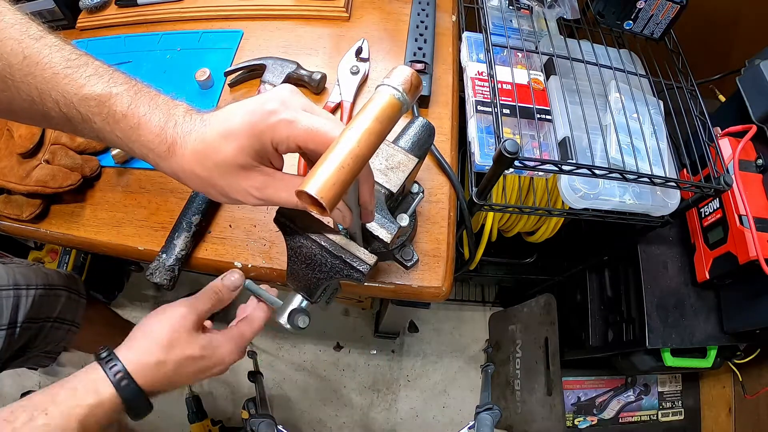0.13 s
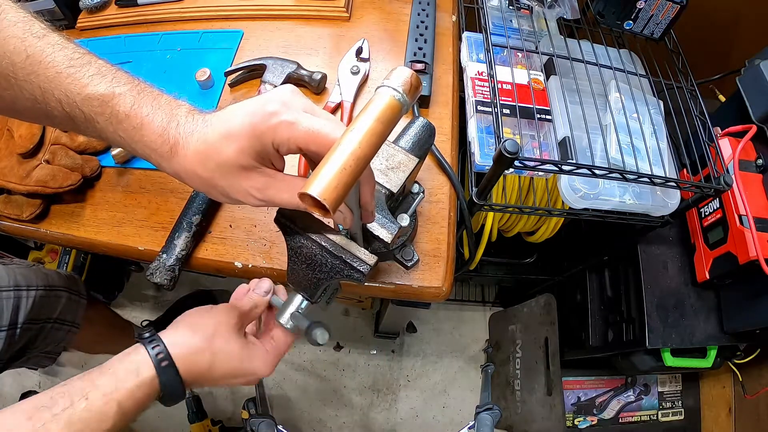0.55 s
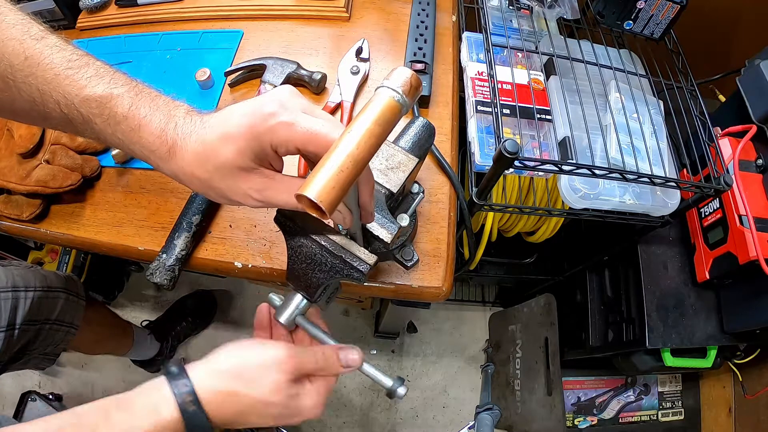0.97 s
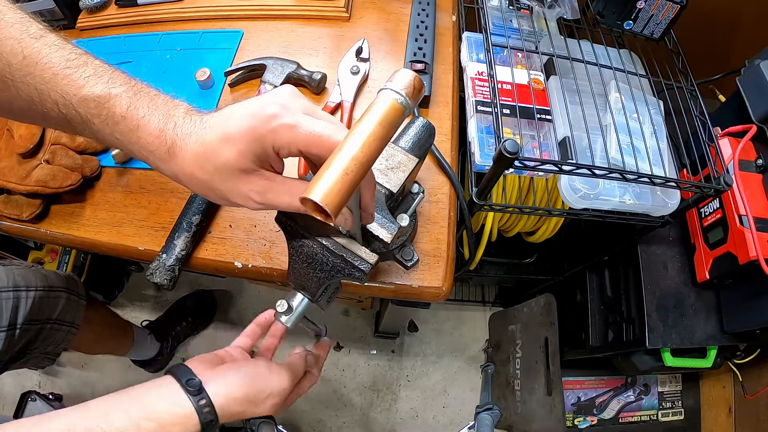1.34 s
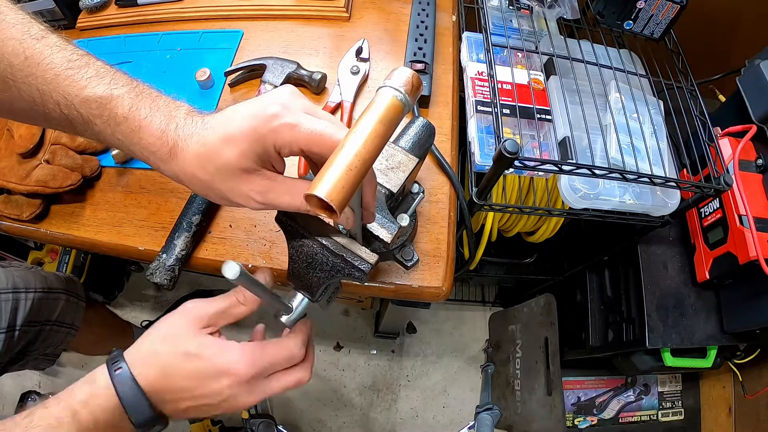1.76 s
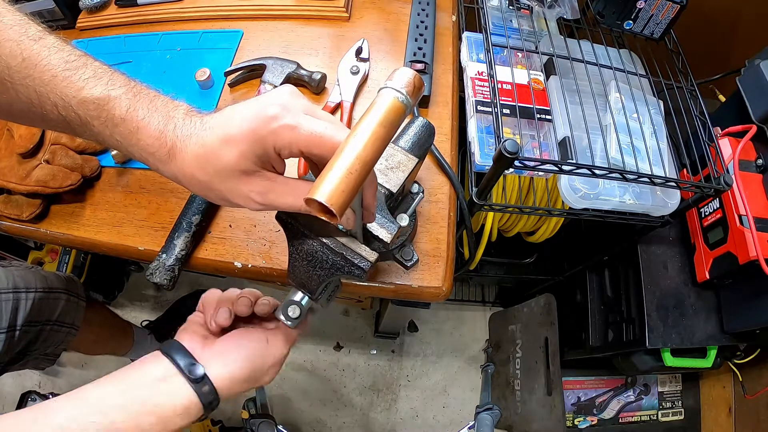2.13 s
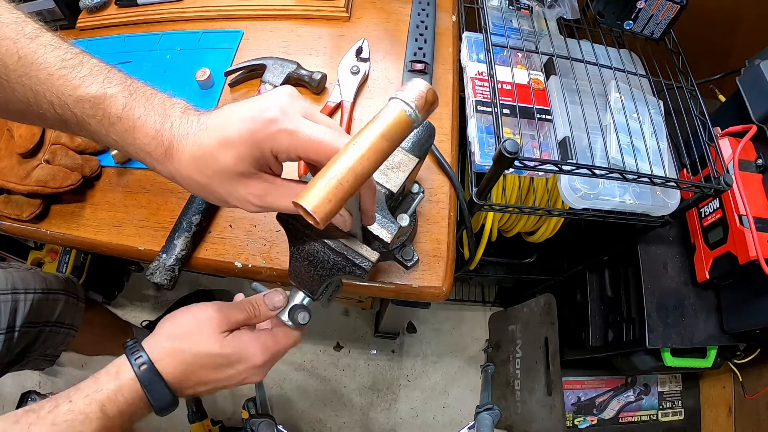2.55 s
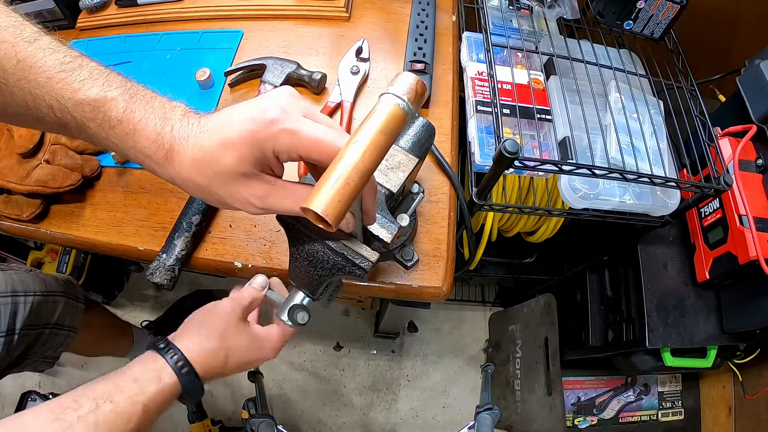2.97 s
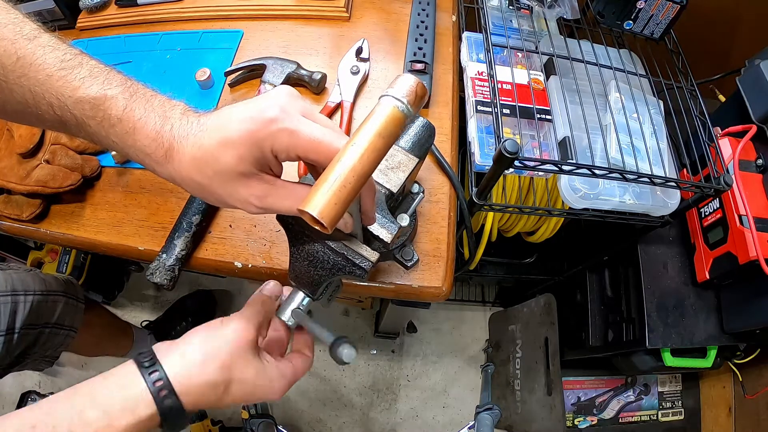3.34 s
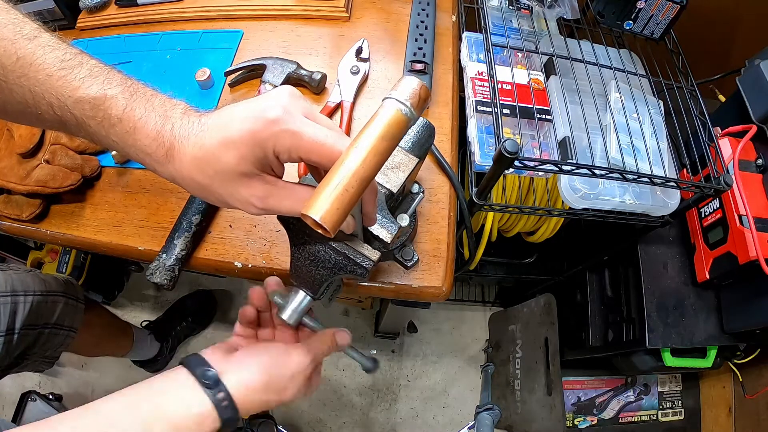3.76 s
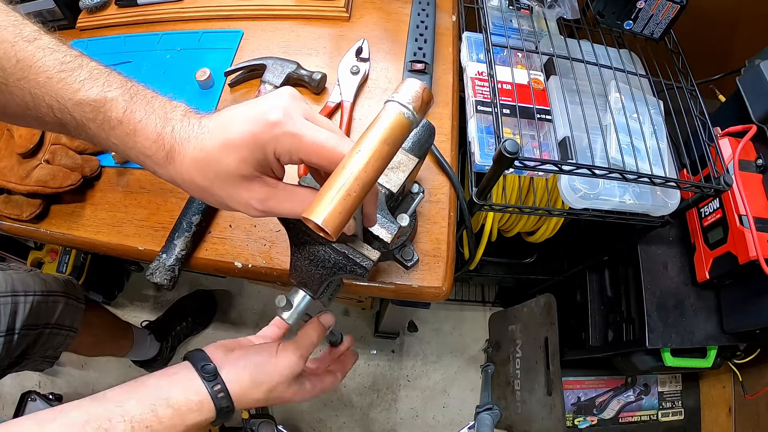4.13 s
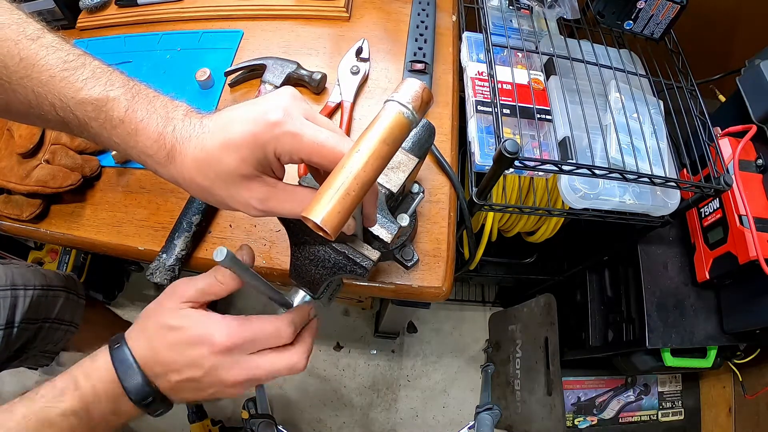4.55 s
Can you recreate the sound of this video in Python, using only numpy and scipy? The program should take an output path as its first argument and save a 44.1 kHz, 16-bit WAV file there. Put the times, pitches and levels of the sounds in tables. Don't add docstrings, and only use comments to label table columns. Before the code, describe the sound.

A hand turns a bench vise whose loose steel bar keeps slipping through the screw hub. Each slide is a brief gritty scrape ending in a hard, bright clank, followed by bounces and a short drag. Duller iron taps and soft wooden thumps fill the spaces between. Recorded close in stereo, with a short garage reverberation and very quiet outdoor air; the final slide is the strongest, with two hard knocks.

```python
import sys
import numpy as np
from scipy import signal
from scipy.fft import rfft, irfft, next_fast_len
from scipy.io import wavfile
from scipy.ndimage import uniform_filter1d

SR = 44100
rng = np.random.default_rng(int(sys.argv[2]) if len(sys.argv) > 2 else 0)


def wav_record(signal):
    frames = np.transpose(np.atleast_2d(signal))
    bounded = np.clip(frames, -1, 1)
    quanta = np.round(bounded * 32767).astype(np.int16)
    wavfile.write(sys.argv[1], SR, quanta)


def volts_from_db(level):
    exponent = np.asarray(level, float) / 20
    return 10 ** exponent


N = 207262


def evened(x):
    return x / np.sqrt(np.mean(abs(x) ** 2) + 1e-20)


def read(points, hz):
    f, value = np.transpose(points)
    return np.interp(np.log(hz + 1), np.log(f + 1), value)


def add(mix, at, sound):
    part = mix[at:][:len(sound)]
    part += sound[:len(part)]


def resonate(x, hz, width_hz):
    r = np.exp(-np.pi * width_hz / SR)
    return signal.lfilter([1 - r], [1, -r * np.exp(2j * np.pi * hz / SR)], x)


def band(x, lo_hz, hi_hz, order=4):
    return signal.sosfilt(signal.butter(order, [lo_hz, hi_hz], "bandpass", fs=SR, output="sos"), x)


# [f/Hz, level/dB per Hz]
HUSH_TONE = [(15, -45), (25, -8), (48, -10.5), (100, -22.5), (198, -4), (422, -13.5), (563, -11.5),
             (1000, -6.5), (1300, -7.5), (1410, -7.5), (1730, -10), (2780, -22), (4220, -31), (7500, -24),
             (13000, -60.5)]
# [f/Hz, left-right likeness]
HUSH_LIKENESS = [(60, 0.88), (240, 0.33), (950, 0.13), (3770, 0.6), (15000, -0.56)]
# [f/Hz, width/Hz, level/dB]
WHINE = (7460, 160, -79)


def air():
    frames, hz = N // 256 + 5, np.fft.rfftfreq(1024, 1 / SR)
    a, b, c, d, patches = rng.standard_normal((frames, 513, 5)).T
    patches = evened(uniform_filter1d(uniform_filter1d(patches, 12, 0), 14, 1))
    same = np.clip(read(HUSH_LIKENESS, hz), -1, 1)[:, None]
    left = a + 1j * b
    right = same * left + np.sqrt(1 - same ** 2) * (c + 1j * d)
    tone = volts_from_db(read(HUSH_TONE, hz)[:, None] + 1.6 * patches)
    z = np.array([left, right]) * tone
    hush = volts_from_db(-55.5) * evened(signal.istft(z, nperseg=1024, noverlap=768)[1][:, :N])
    whine_hz, width_hz, whine_db = WHINE
    whine = resonate(rng.standard_normal((2, N)), whine_hz, width_hz)
    whine = resonate(whine, whine_hz, width_hz).real
    return hush + volts_from_db(whine_db + 3.5) * evened(whine)


def swell(peak_s, peak_db, lag_s, rise_db_per_s, fall_db_per_s):
    hold_s = 0.02
    coarse = np.arange(0, N, 64)
    late = coarse[None] / SR - peak_s[:, None] - lag_s
    slope = np.where(late < 0, rise_db_per_s, fall_db_per_s)
    db = peak_db[:, None] - slope * np.maximum(abs(late) - hold_s, 0)
    return np.interp(np.arange(N), coarse, np.sqrt((volts_from_db(db) ** 2).sum(0)))


# [f/Hz, width/Hz]
WOOD = [
    (139, 12),
    (198, 14),
    (262, 24),
    (85, 40),
]
# [peak t/s, sway level/dB, board level/dB, floor thud level/dB]
JOLTS = [(0.0, -55, -51.5, -54.5), (0.188, -39.5, -35, -41.5), (0.28, -63, -56, -62),
         (0.49, -63, -53.5, -80), (0.581, -55, -48, -58), (0.79, -49, -47, -49.5),
         (0.955, -68, -53.5, -60.5), (1.05, -53, -49, -67), (1.148, -42.5, -42.5, -47.5),
         (1.278, -64, -44, -80), (1.369, -57, -48.5, -83), (1.505, -54, -42, -70), (1.64, -60, -45, -80),
         (1.799, -47, -43.5, -49), (1.898, -56, -52, -69), (2.158, -54.5, -45.5, -51.5),
         (2.341, -52.5, -50.5, -77), (2.52, -53, -74, -77), (2.631, -42.5, -36.5, -46),
         (2.87, -67, -59, -75), (3.155, -62.5, -49, -85), (3.446, -56.5, -44, -62), (3.55, -57, -52, -84),
         (3.665, -73, -47.5, -70), (3.742, -56, -44, -60), (3.883, -40, -36, -44),
         (4.271, -53.5, -46.5, -73), (4.36, -52, -37.5, -61), (4.478, -33.5, -42, -51),
         (4.598, -58, -41.5, -54)]
# [peak t/s, sway level/dB, board level/dB, floor thud level/dB]
NUDGES = [(0.101, -64, -55, -79), (0.69, -60, -56, -71), (0.86, -62, -64, -67), (1.72, -70, -51, -76),
          (2.051, -57.5, -55, -64), (2.22, -66, -60, -69), (2.699, -48, -49, -56), (3.0, -75, -80, -91),
          (3.26, -62, -54.5, -76), (3.385, -53.5, -71, -80), (3.949, -50, -61, -53), (4.09, -74, -66, -86),
          (4.19, -57.5, -55.5, -80), (4.67, -65, -53, -58)]


def bench(casting):
    peak_s, sway_db, board_db, thud_db = np.transpose(JOLTS + NUDGES)
    rock = swell(peak_s, sway_db, lag_s=0.0049, rise_db_per_s=1002, fall_db_per_s=401)
    flex = swell(peak_s, board_db, lag_s=-0.0023, rise_db_per_s=1402, fall_db_per_s=330)
    stamp = swell(peak_s, thud_db, lag_s=-0.011, rise_db_per_s=1000, fall_db_per_s=397)
    smoothing_s, law = 0.03, 0.91
    blows = resonate(resonate(casting ** 2, 0, 1 / smoothing_s), 0, 1 / smoothing_s).real
    blows = abs(blows) ** (law / 2)

    push = rng.standard_normal((5, N))
    sway, board, upper, deep = (evened(resonate(resonate(p, *m), *m)) for p, m in zip(push, WOOD))

    def steady(x):
        return np.sqrt(2) * x.real / (abs(x) + 0.67)

    out = volts_from_db(5.5) * rock * steady(sway) + volts_from_db(1.0) * flex * steady(board)
    out += (volts_from_db(-10.5) * blows + volts_from_db(-9) * stamp) * evened(band(push[4], 199, 805))
    out += (volts_from_db(-19.5) * blows + volts_from_db(-8.5) * flex) * steady(upper)
    out += volts_from_db(6.0) * stamp * band(steady(deep), 45, 82)
    apart = volts_from_db(-16.0) * stamp * evened(band(rng.standard_normal(N), 12, 100, order=2))
    return out + np.outer([1, -1], apart)


def favoured(modes, hz, boost_db):
    modes = np.array(modes, float)
    boost = boost_db * np.exp(-(np.log(modes[:, 0] / hz) / 0.12) ** 2)
    return modes + np.outer(boost, [0, 1, 0])


# [f/Hz, level/dB, t60/s]
CASTING = [(603, -9, .18), (725, -9, .13), (890, -7, .13), (985, -6, .13), (1138, -3, .13), (1212, 0, .11),
           (1305, -2, .13), (1345, -1, .16), (1400, -4, .13), (1530, -8, .09)]
# [f/Hz, level/dB, t60/s]
SCREW = [(1820, -7, .08), (1965, -3, .09), (2200, -5, .2), (2295, -4, .14), (2455, -3, .07),
         (2655, -3, .15), (2795, -5, .12), (2910, -7, .15), (3140, -5, .1)]
# [f/Hz, level/dB, t60/s]
BAR = [(3700, -7, .07), (3865, -3, .15), (3975, -7, .07), (4420, -7, .07), (4620, -8, .09),
       (5260, -10, .08), (5480, -6, .14), (5810, -11, .07), (6370, -10, .12)]
# [f/Hz, level/dB, t60/s]
TICK = [(7190, -3, .045), (7690, -2, .04), (8100, -6, .03), (8700, -12, .03), (9420, -12, .04),
        (9900, -12, .04), (10450, -11, .035), (11700, -11, .03), (12600, -11, .03), (13600, -10, .03)]
MODES = [CASTING, SCREW, BAR, TICK]
# [low edge f/Hz, high edge f/Hz, clank level/dB re ring, clank t60/s,
#              left-right level/dB, left lead/rad]
PARTS = [
    (570, 2510, 54, 0.069, 3.5, 0.9),
    (1700, 4040, 0.5, 0.0042, 2.6, 0.48),
    (3060, 7200, 14, 0.024, -3.5, 0.39),
    (5830, 11570, -7, 0.053, -1.5, 1.51),
]


def response(modes, lo_hz, hi_hz, clank_db, clank_t60, spread_db, wander, crack_db):
    t = np.arange(12000) / SR
    hz, db, t60 = np.transpose(modes)[:, :, None]
    db = db + spread_db * rng.standard_normal(db.shape)
    turns = hz * (1 + wander * rng.standard_normal(hz.shape)) * t + rng.random(hz.shape)
    tones = volts_from_db(db) * np.sin(2 * np.pi * turns)
    quick = volts_from_db(-60 * t / clank_t60)
    ring = (tones * volts_from_db(-60 * t / t60)).sum(0)
    clank = tones.sum(0) * quick
    crack = band(rng.standard_normal(len(t)) * quick, lo_hz, hi_hz)
    ring, clank, crack = (x / np.linalg.norm(x) for x in (ring, clank, crack))
    return band(ring + volts_from_db(clank_db) * (clank + volts_from_db(crack_db) * crack), lo_hz, hi_hz, order=2)


# [t/s, bar ring peak level/dB, casting level/dB re bar,
#                                 bright tick level/dB re bar, favoured mode f/Hz]
RATTLES = [
    (0.0948, -53.5, 1, -5, 4520),
    (0.1421, -38.5, 17.5, -10, 1790),
    (0.5801, -41, 9, -10, 1840),
    (1.118, -72, 5, 7, 2040),
    (1.5846, -45, 10.5, -3, 2670),
    (1.7541, -24.5, 5, -14.5, 3680),
    (1.7689, -31, -20, -32, 2050),
    (2.4714, -44, 9, -51, 2730),
    (3.2414, -48.5, 4.5, -16, 1670),
    (3.7234, -68.5, 33, -11, 2360),
]
# [t/s, bar ring peak level/dB, casting level/dB re bar,
#                                            bright tick level/dB re bar, favoured mode f/Hz]
KNOCKS = [(0.2264, -52, 12.5, -28, 2150), (0.4307, -66, 13, -17, 1620), (0.4797, -67, 3, -10, 1710),
          (0.5476, -41, 7, -15, 1700), (0.7598, -12, -8, -9, 3580), (1.2254, -64, -3, -21, 1950),
          (2.113, -65, 7, 5, 2590), (2.2841, -49.5, 9, -19, 2010), (2.3052, -45.5, 3.5, -35, 3200),
          (2.3875, -54, -23, -21.5, 1780), (2.5971, -34, 15, 0.5, 2040), (3.0815, -50, 8, -2, 2080),
          (3.374, -22, -5.5, -12, 3470), (3.5127, -30.5, -2.5, -43, 3870), (3.8447, -48.5, 15, -7, 2870),
          (4.4346, -13, -2, -8.5, 2280), (4.5628, -21, -6, -8.5, 4500)]
# [t/s, bar ring peak level/dB, casting level/dB re bar,
#                                     bright tick level/dB re bar, favoured mode f/Hz]
CLATTERS = [
    (0.8945, -32, -4.5, -12, 2500),
    (0.9233, -32.5, -1.5, -25, 3900),
    (1.4601, -27, -3.5, -45, 3865),
    (1.8464, -32.5, 4, -19.5, 2440),
    (1.9844, -56.5, 14, -18, 3110),
    (2.0832, -47.5, 18.5, -10, 2720),
    (2.3176, -44.5, -21, -13, 2930),
    (2.4894, -48.5, 14, -6, 1700),
    (4.1719, -61, 23, -19, 2790),
    (4.2398, -49.5, 6.5, -7, 2600),
]


def knocks(table, length_s, rise):
    out = np.zeros((4, N))
    u = np.arange(2048) / SR / length_s
    shape = np.minimum(u / rise, 1) * np.exp(-u ** 2)
    for s, bar_db, casting_db, tick_db, favoured_hz in table:
        contacts = rng.standard_normal(len(u))
        for _ in range(4):
            z = rfft(contacts / (uniform_filter1d(abs(contacts), 30) + 1e-12) * shape)
            contacts = irfft(z / (abs(z) + 1e-12))
        near_end = np.exp(-(np.log(favoured_hz / 2515) / 0.084) ** 2)
        screw_db = -0.5 + 0.61 * casting_db + 7 * near_end
        levels_db = bar_db + np.array([casting_db, screw_db, 0, tick_db])
        dull = 2 ** (-np.clip(casting_db, 0, 15) / 26)
        for k, modes in enumerate(MODES):
            lo_hz, hi_hz, clank_db, clank_t60 = PARTS[k][:4]
            if k >= 2:
                hi_hz = hi_hz * dull
            struck = 0.97 * modes[0][0] < favoured_hz < 1.03 * modes[-1][0]
            free_db = 4.0 * struck
            body = response(favoured(modes, favoured_hz, 14.0), lo_hz, hi_hz, clank_db - free_db, clank_t60,
                            spread_db=3.5, wander=0.006, crack_db=[-3, -3, -2, 3][k])
            ring = signal.fftconvolve(contacts * np.sqrt(shape), body)
            add(out[k], round(s * SR), volts_from_db(levels_db[k]) * ring / abs(ring).max())
    return out


# [start t/s, length/s, bar level/dB, casting level/dB re bar, fizz level/dB re bar]
SLIDES = [
    (0.555, 0.14, -50.5, -4, -14.5),
    (0.635, 0.18, -48, 5, -16.5),
    (1.57, 0.11, -54.5, 10, -16),
    (1.635, 0.13, -45, 2.5, -16),
    (2.29, 0.067, -62.5, 6, -10),
    (3.235, 0.074, -58.5, 12, -17),
    (3.3, 0.1, -56.5, 7, -15),
    (4.28, 0.11, -42.5, 4, -10),
    (4.35, 0.077, -47, 13, -8),
]
# [start t/s, length/s, bar level/dB, casting level/dB re bar, fizz level/dB re bar]
DRAGS = [(0.785, 0.13, -53, 3.4, -13), (0.935, 0.16, -83.5, 17, -23), (1.035, 0.079, -81.5, 18.6, -15),
         (1.475, 0.18, -64.5, 3.4, -22), (1.78, 0.053, -62, 3.3, -27), (1.865, 0.2, -75, 5.8, -24),
         (3.39, 0.052, -48.5, 2.2, -18), (3.45, 0.061, -50.5, 4, -21), (3.525, .09, -66, 8, -24),
         (4.46, 0.12, -52.5, 6.7, -7), (4.58, 0.2, -67, 6.5, -12)]


def slides(table, rubbed_hz, trend_db_per_s, edge_s):
    out = np.zeros((4, N))
    for s, length, bar_db, casting_db, fizz_db in table:
        t = np.arange(0, length, 1 / SR)
        grit = rng.standard_normal(9000) * volts_from_db(0.93 * rng.exponential(1, 9000))
        grit = evened(grit * (rng.random(9000) < 0.03))
        soft_ends = np.clip(np.minimum(t, length - t) / edge_s, 0, 1)
        stroke = soft_ends * volts_from_db(trend_db_per_s * (t - length / 2))
        screw_db = 2.5 + 0.37 * casting_db
        levels_db = bar_db + np.array([casting_db, screw_db, 0, fizz_db])
        for k, modes in enumerate(MODES):
            for hz in rubbed_hz:
                clumps = evened(uniform_filter1d(rng.standard_normal(9000), 600))
                clumps = evened(volts_from_db(3.8 * clumps))
                damped = favoured(np.array(modes) * [1, 0.6, 0.3], hz, 13.0)
                body = response(damped, *PARTS[k][:2], clank_db=-2.0, clank_t60=0.03,
                                spread_db=5.0, wander=0.012, crack_db=1.5)
                drive = (grit * clumps)[:len(t)] * stroke * volts_from_db(levels_db[k]) / np.sqrt(3)
                add(out[k], round(s * SR), signal.fftconvolve(drive, body / np.linalg.norm(body)))
    return out


# [f/Hz, t60/s]
GARAGE = [(200, 0.95), (1000, 0.38), (4000, 0.26), (12000, 0.23)]


def garage(x):
    taps = np.zeros((2, SR // 2))
    at = np.arange(200, SR // 2 - 20, 20)
    at = at + rng.integers(0, 20, (2, len(at)))
    np.put_along_axis(taps, at, rng.choice([-1., 1.], at.shape), 1)
    hz, t, z = signal.stft(taps, SR, nperseg=256)
    decay = volts_from_db(-60 * t / read(GARAGE, hz)[:, None])
    tail = signal.istft(z * decay, SR, nperseg=256)[1]
    return signal.fftconvolve(x[None], tail / np.linalg.norm(tail[0]), axes=1)[:, :N]


def scene():
    struck = knocks(RATTLES, length_s=0.0163, rise=0.12)
    struck += knocks(KNOCKS, length_s=0.00396, rise=0.278)
    struck += knocks(CLATTERS, length_s=0.0066, rise=0.482)
    rubbing = slides(SLIDES, rubbed_hz=(1294, 2630, 3900), trend_db_per_s=-5, edge_s=0.03)
    rubbing += slides(DRAGS, rubbed_hz=(3900, 2210, 1264), trend_db_per_s=-85, edge_s=0.0066)
    felt = struck[0] + volts_from_db(-3.5) * rubbing[0]
    iron = struck + rubbing
    whole = signal.hilbert(iron, next_fast_len(N))[:, :N]
    half = np.array([volts_from_db(p[4] / 2) * np.exp(0.5j * p[5]) for p in PARTS])[:, None]
    direct = np.array([(whole * half).real.sum(0), (whole / half).real.sum(0)])
    return volts_from_db(0.5) * direct + volts_from_db(-4.5) * garage(iron.sum(0)) + bench(felt) + air()


def band_limit(x):
    return signal.sosfilt(signal.butter(12, 15630, fs=SR, output="sos"), x)


def record(dry):
    limited = signal.sosfilt(signal.butter(6, 15200, fs=SR, output="sos"), dry)
    return band_limit(limited)


dry = scene()
out = record(dry)
wav_record(out)
```